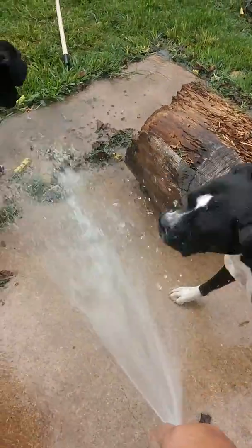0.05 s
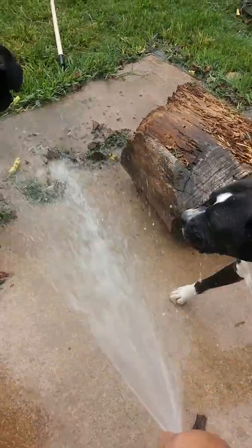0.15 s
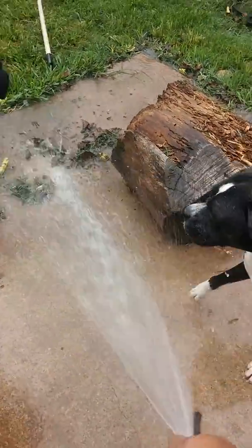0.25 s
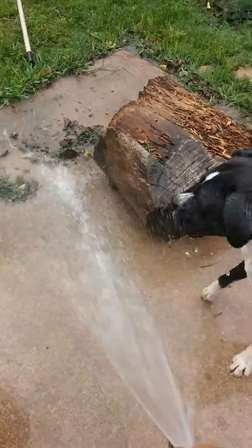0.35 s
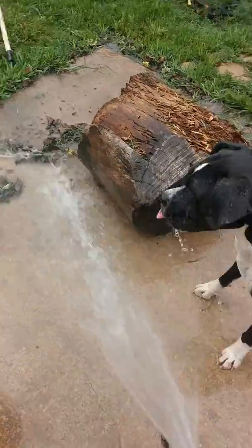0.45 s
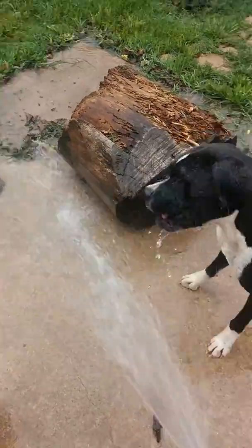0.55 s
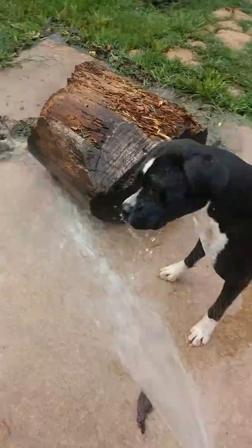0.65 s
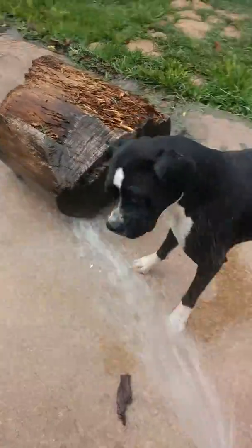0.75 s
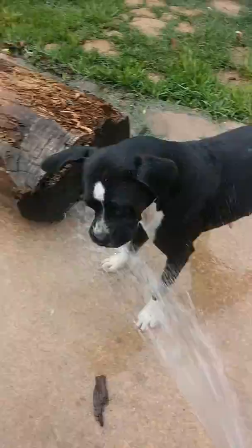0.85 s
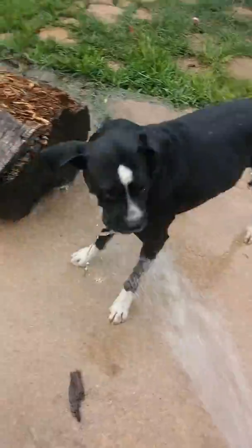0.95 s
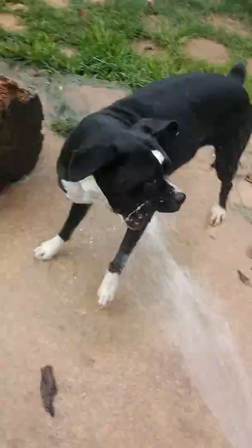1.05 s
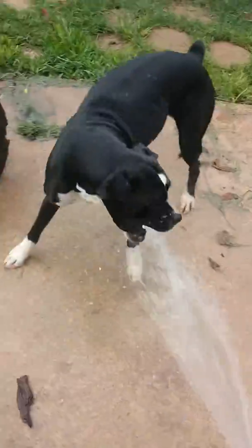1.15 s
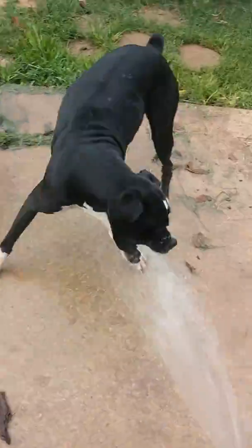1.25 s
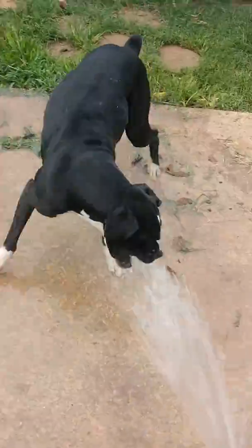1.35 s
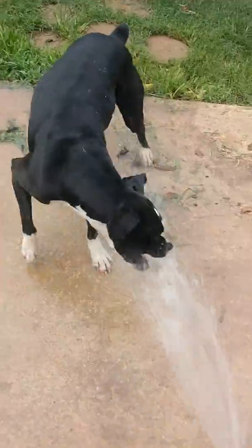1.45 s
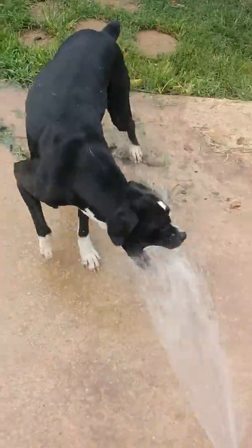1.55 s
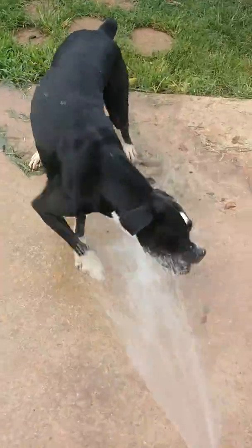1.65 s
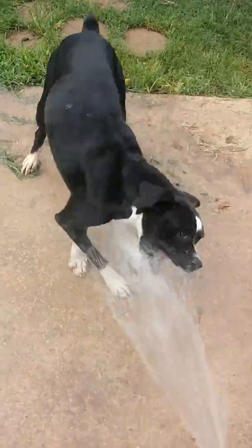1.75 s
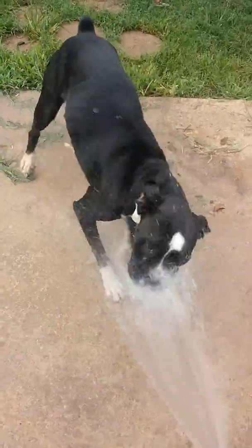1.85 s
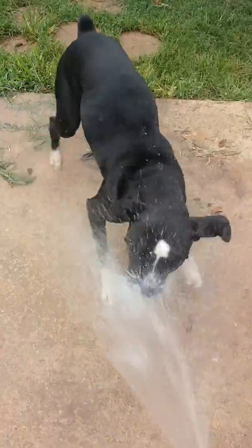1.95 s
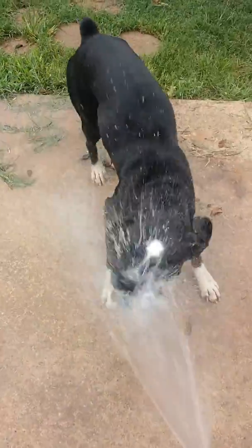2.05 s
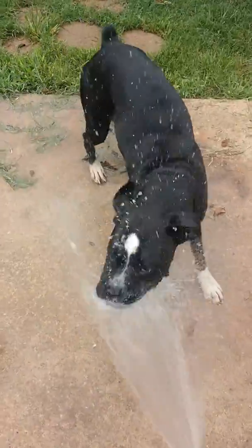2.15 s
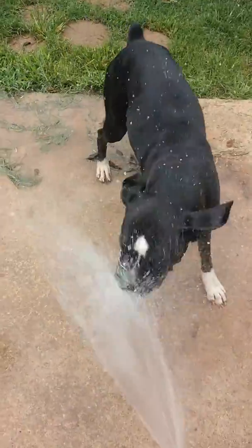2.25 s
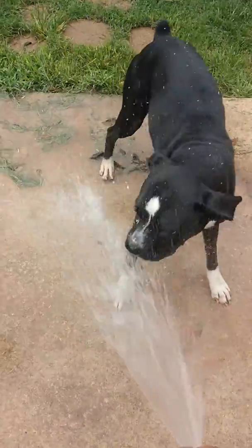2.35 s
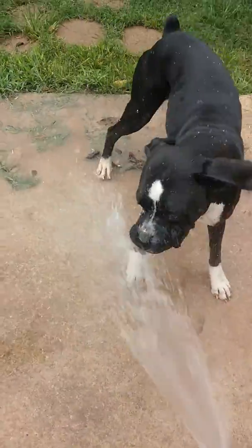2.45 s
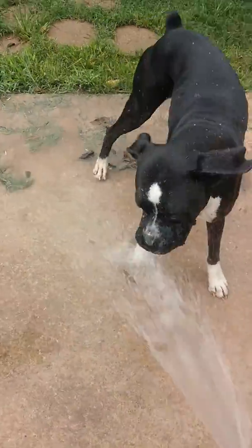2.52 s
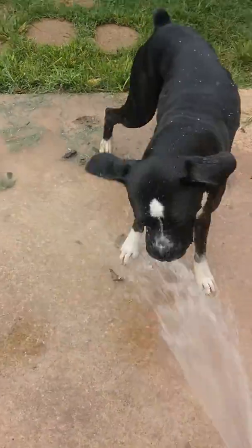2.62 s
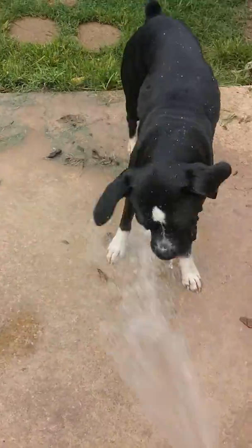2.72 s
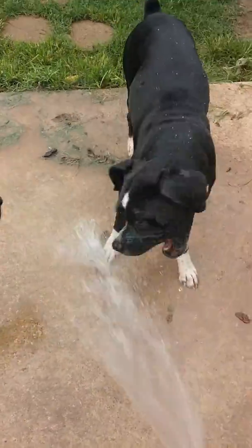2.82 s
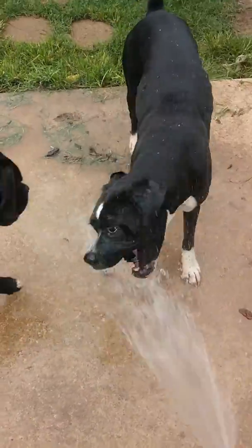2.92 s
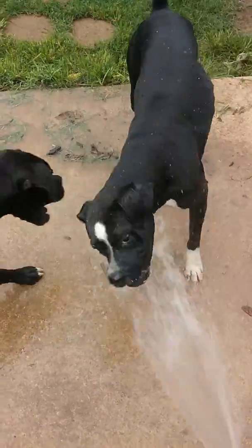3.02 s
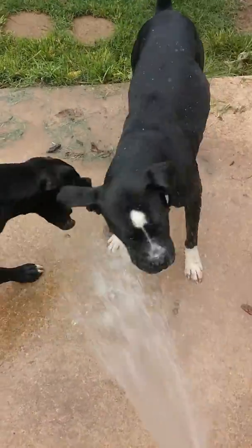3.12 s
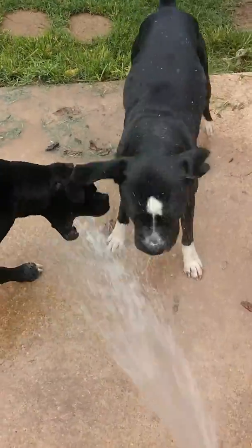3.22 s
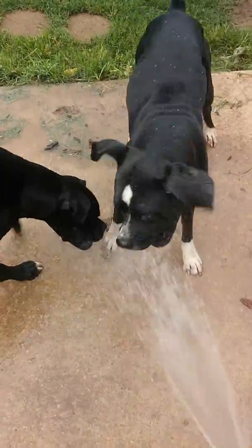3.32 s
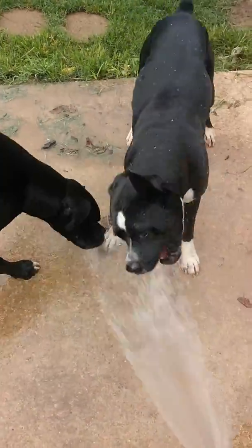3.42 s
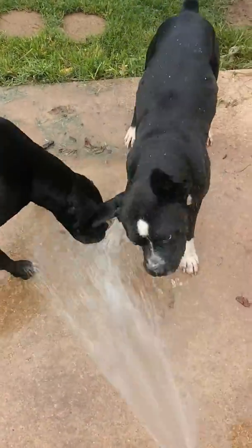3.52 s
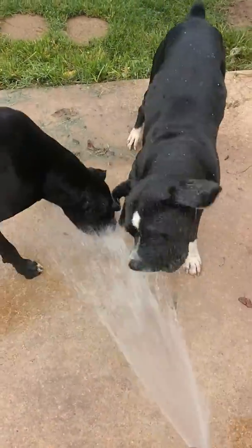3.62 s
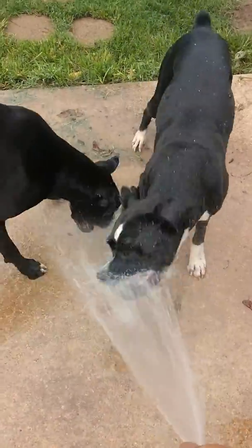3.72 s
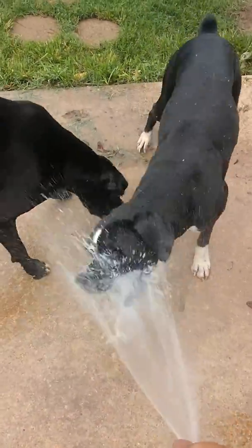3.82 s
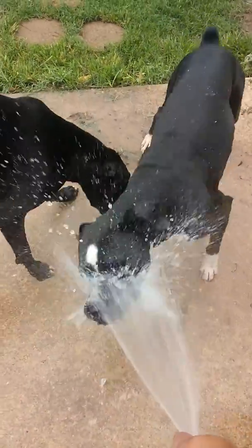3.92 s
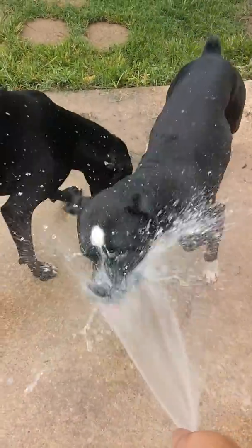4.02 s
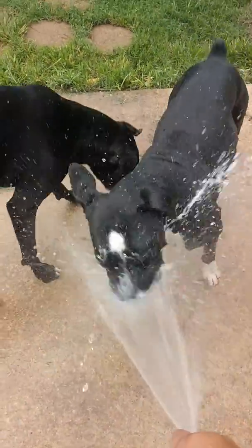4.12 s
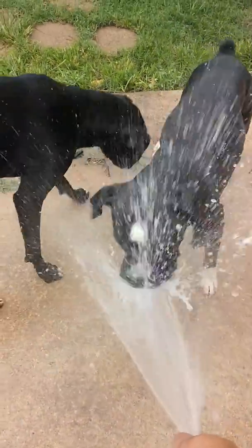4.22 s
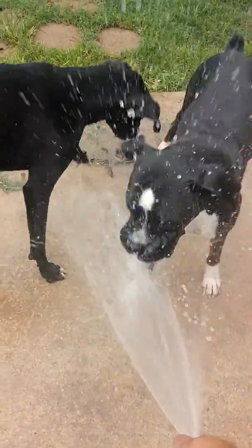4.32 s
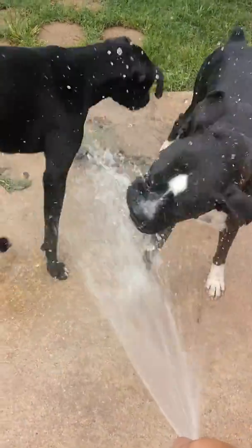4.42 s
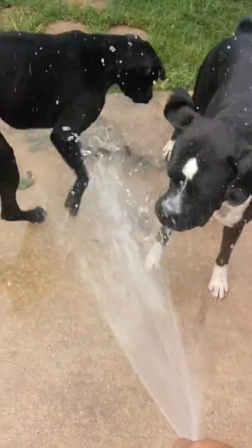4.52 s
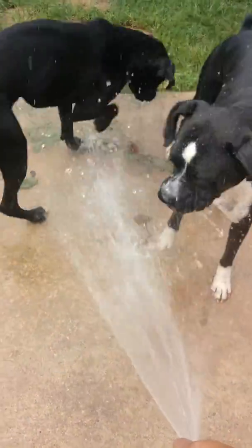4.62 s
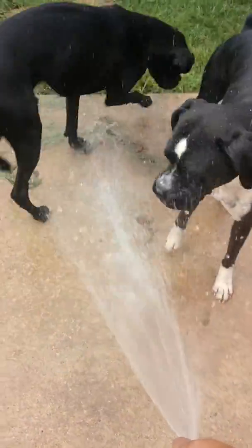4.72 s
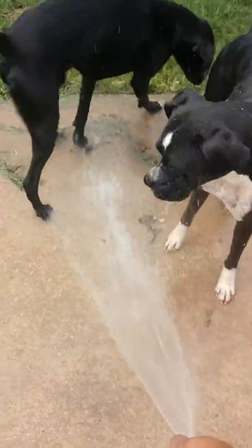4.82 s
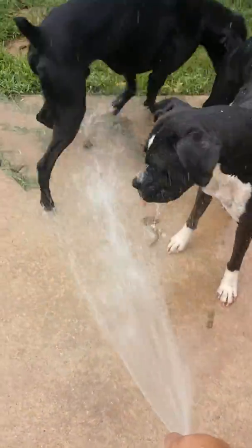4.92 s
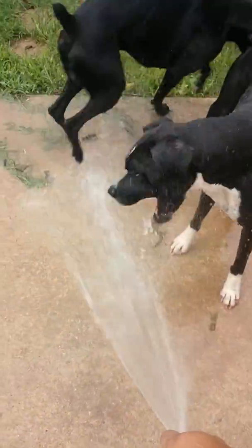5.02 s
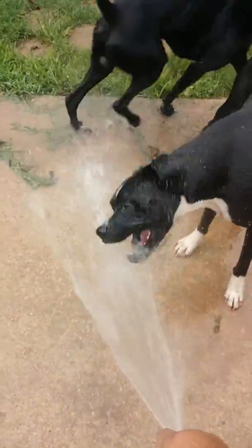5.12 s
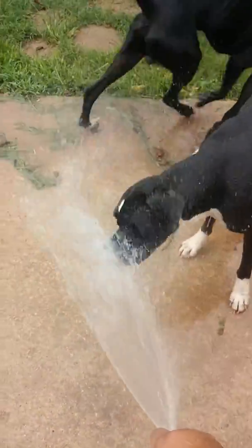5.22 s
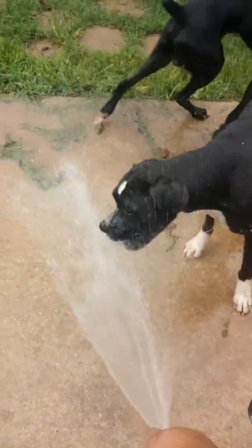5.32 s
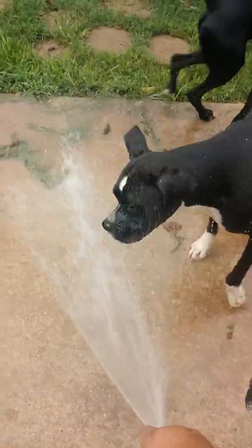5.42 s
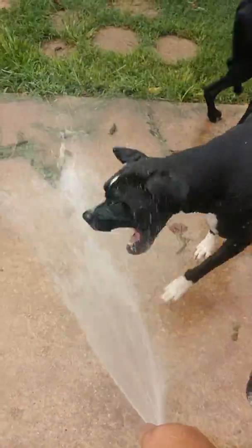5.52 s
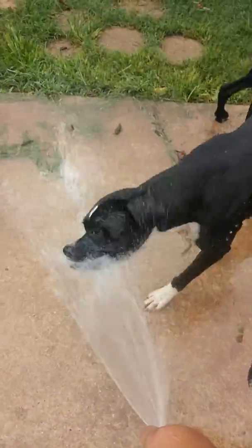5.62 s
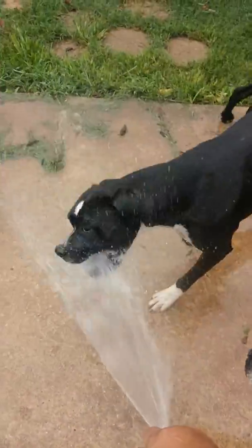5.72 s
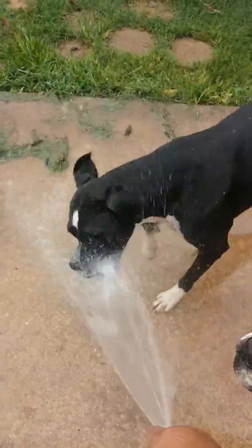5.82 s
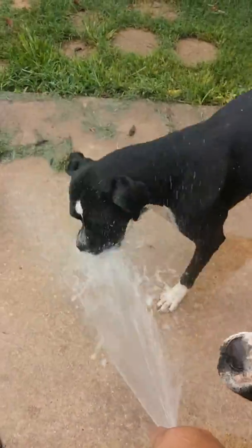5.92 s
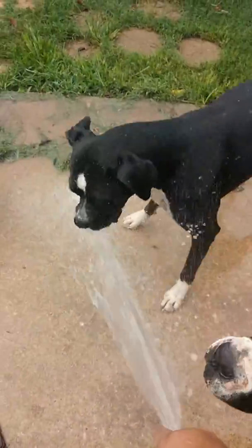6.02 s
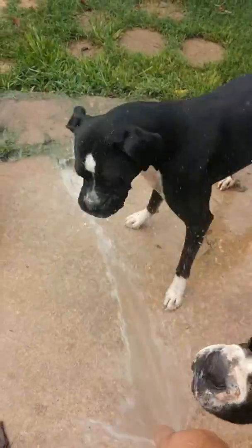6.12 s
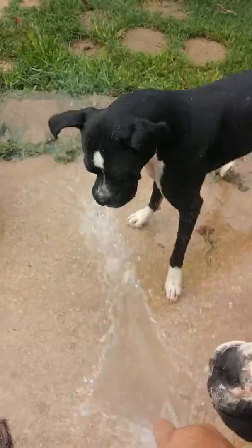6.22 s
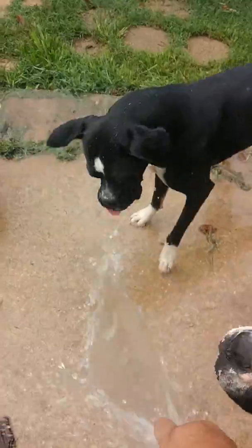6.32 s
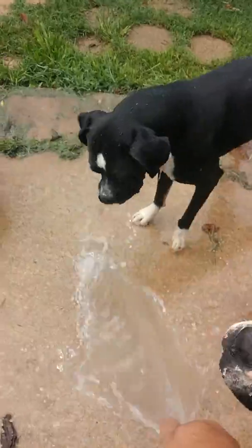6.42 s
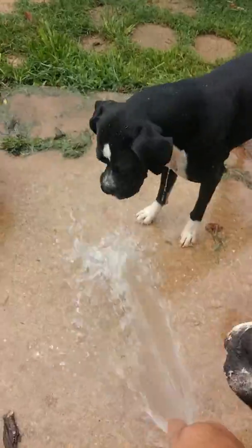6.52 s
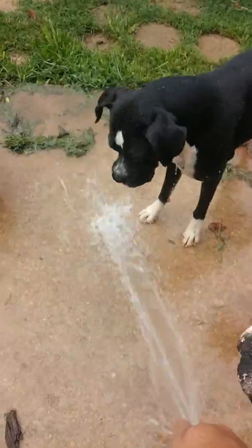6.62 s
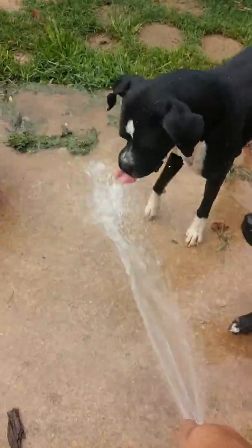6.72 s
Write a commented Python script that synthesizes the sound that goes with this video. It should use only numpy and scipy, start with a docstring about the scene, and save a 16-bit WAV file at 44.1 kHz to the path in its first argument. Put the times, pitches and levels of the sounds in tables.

```python
"""Water hisses on a concrete patio close to a two-port microphone: a garden hose, and a dog biting the jet.
Dense rains of damped rings over coloured noise make the fizz and patter on the slab; on the muzzle the jet
splatters, drums on the cheeks and gurgles in the open mouth. Ringing air pockets make the jaw claps and pops,
sliding narrow noise makes the slurps and a faint thin whistle that sinks, and fat drops slap the slab.
A low, uneven outdoor rumble lies underneath."""
import sys
import numpy as np
from scipy import signal
from scipy.fft import rfft, irfft, next_fast_len
from scipy.io import wavfile
from scipy.ndimage import uniform_filter1d, map_coordinates

SR = 44100
rng = np.random.default_rng(int(sys.argv[2]) if len(sys.argv) > 2 else 0)


def unload_wav(signal):
    """Save mono or channel-first audio to the path in sys.argv[1] as 16-bit WAV at rate SR, clipped to [-1, 1]."""
    wavfile.write(
        sys.argv[1],
        SR,
        np.round(np.clip(np.atleast_2d(signal).T, -1, 1) * 32767).astype(np.int16),
    )


N = 298116  # length [samples]


def amp(db):
    """Decibels to gain."""
    return 10 ** (np.asarray(db) / 20)


def unit(x):
    """Scale to rms 1."""
    return x / np.sqrt(np.mean(x ** 2) + 1e-20)


def along(points, hz):
    """Read (frequency [Hz], value) points on a log frequency axis."""
    f, v = np.transpose(points)
    return np.interp(np.log(hz + 1), np.log(f + 1), v)


def curves(rows):
    """One value per sample for each column after the time."""
    s, *cols = np.transpose(rows)
    return [np.interp(np.arange(N) / SR, s, c) for c in cols]


def wobble(rate):
    """A smooth random curve, rate knots a second."""
    knots = rng.standard_normal(int(N * rate / SR) + 4)
    return map_coordinates(knots, [np.arange(N) * rate / SR])


def filtered(x, response):
    """x times a response of frequency."""
    m = next_fast_len(N + 8192)
    return irfft(rfft(x, m) * response(np.fft.rfftfreq(m, 1 / SR)), m)[..., :N]


def pan(lean_db):
    """Left and right gains for a left-minus-right level difference."""
    return amp(np.array([[.5], [-.5]]) * lean_db)


def add(track, s, sound):
    """Mix a short sound into the track at time s."""
    part = track[:, round(s * SR):][:, :sound.shape[-1]]
    part += sound[..., :part.shape[1]]


def patchy(x, depth_db):
    """Shifting streams lift and drop small patches of pitch and time."""
    z = signal.stft(x, nperseg=1024)[2]
    field = uniform_filter1d(rng.standard_normal(z.shape[1:]), size=4, axis=0)
    field = uniform_filter1d(field, size=5, axis=1)
    return signal.istft(z * amp(depth_db * unit(field)), nperseg=1024)[1][:, :N]


def narrow(hz, width_hz):
    """Noise of rms 1 in a narrow band that follows a moving resonance."""
    at = np.arange(len(hz)) * width_hz / SR
    a, b = (map_coordinates(knots, [at], mode="wrap") for knots in rng.standard_normal((2, 128)))
    phase = 2 * np.pi * np.cumsum(hz) / SR
    return unit(a * np.cos(phase) + b * np.sin(phase))


def drops(lo_hz, hi_hz, cycles, spread_db, lag_s, count, size):
    """Stereo rain of damped rings: each drop has its own moment, pitch, weight and direction."""
    when, pitch, weight, place = rng.random((count, 4)).T[..., None]
    hz = lo_hz + (hi_hz - lo_hz) * pitch
    turns = hz * np.arange(size) / SR
    gain = np.sqrt(hz) * amp(-spread_db * np.log(weight + .01))
    ring = gain * np.exp(-turns / cycles) * np.sin(2 * np.pi * turns)
    start = (when * N).astype(int) + np.arange(size)
    lag = np.round((2 * place - 1) * lag_s * SR).astype(int)  # off-centre drops reach one port later
    ports = [np.bincount(np.abs(at).ravel(), ring.ravel(), N)[:N] for at in (start, start + lag)]
    return unit(np.array(ports))


def water(colour, grains, wash_db, patchy_db):
    """Single drops over the merged wash of countless small ones, coloured by what they hit."""
    # how alike the wash is at the two ports: (frequency [Hz], correlation [-1 to 1])
    likeness = [(60, .8), (130, 0.92), (290, 1), (640, 0.36), (1400, 0.015), (3100, 0.28), (6000, -0.15),
                (15000, 0.12)]

    def turn(hz):
        return np.arccos(np.clip(along(likeness, hz), -1, 1)) / 2

    def tint(hz):
        return amp(along(colour, hz))

    noise = patchy(rng.standard_normal((2, N)), patchy_db)
    mid, side = filtered(noise, lambda hz: tint(hz) * [np.cos(turn(hz)), np.sin(turn(hz))])
    wash = unit(np.array([mid + side, mid - side]))
    return unit(unit(filtered(grains, tint)) + amp(wash_db) * wash)


def cavity(hz, t60, rise, wet_db, wet_t60, width):
    """A struck pocket of air: a short rising ring and a wet rustle around the same pitch; peak 1."""
    t = np.arange(SR // 5) / SR
    pitch = hz * (1 + rise * np.minimum(t / t60, 1))
    ring = np.sin(2 * np.pi * np.cumsum(pitch) / SR) * amp(-60 * t / t60)
    f = np.fft.rfftfreq(len(t), 1 / SR) + 1
    band = 1 / (1 + (np.log2(f / hz) / width) ** 4)  # width in octaves
    rustle = unit(irfft(rfft(rng.standard_normal(len(t))) * band, len(t)))
    onset = 1 - np.exp(-2 * t * hz)
    sound = (ring + rustle * amp(wet_db - 60 * t / wet_t60)) * onset
    return sound / np.abs(sound).max()


def yard():
    """A low, uneven outdoor rumble: coloured noise nearly the same at both ports."""
    # rumble under the patio: (time [s], relative level [dB])
    rumble = [(0, -52.5), (1.0, -57), (2.25, -42.5), (2.6, -55.5), (3.1, -45.5), (3.55, -54), (3.78, -38),
              (4.1, -46.5), (5.5, -55), (5.9, -45), (6.15, -57), (6.76, -58)]
    # colour of the open air: (frequency [Hz], gain [dB])
    air_colour = [(20, -20), (45, -8), (70, 2), (110, 2), (200, -2.5), (340, -59), (570, -100)]
    air = rng.standard_normal(N) + 0.33 * rng.standard_normal((2, N))
    level_db = curves(rumble)[0] + 2.5 + 3.1 * wobble(11.0)
    return amp(level_db) * unit(filtered(air, lambda hz: amp(along(air_colour, hz))))


def whistle():
    """A faint, wavering whistle: a narrow noise band that sinks and fades."""
    # path of the whistle: (time [s], pitch [Hz], level [dB])
    path = [(4.40, 3060, -55), (4.44, 3050, -34), (4.51, 2980, -40), (4.59, 2940, -39), (4.68, 2810, -45),
            (4.77, 2800, -55)]
    hz, db = curves(path)
    t = np.arange(N) / SR
    tone = narrow(hz, width_hz=50)
    return tone * amp(db) * (t > path[0][0]) * (t < path[-1][0])


def slaps():
    """A fat drop cracks on the concrete and scatters into a short sizzle."""
    # fat drops on the slab: (time [s], peak [dB], relative left-right lean [dB])
    fat_drops = [(0.5334, -12, 18), (0.6067, -14, 3.5), (0.7198, -11, -4), (0.824, -10.5, -11),
                 (0.9986, -11, 2), (1.5657, -23, -7), (1.708, -20, -6), (2.793, -25, -9), (4.5301, -13, 6),
                 (4.589, -15, 15), (5.3423, -8, 4), (6.1494, -13, -2), (6.5316, -13.5, -4), (6.575, -16, 4),
                 (6.7448, -11, 3.0)]
    track = np.zeros((2, N))
    for s, db, lean_db in fat_drops:
        crack = cavity(6130, t60=0.0035, rise=0, wet_db=-15, wet_t60=0.028, width=0.48)
        add(track, s, amp(db) * pan(0.56 * lean_db) * crack)
    return track


def pops():
    """Trapped air bursts from the lips and the puddles, each a short ring of rising pitch."""
    # bursting pockets: (time [s], peak [dB], starting pitch [Hz], 60 dB decay [s], left-right lean [dB])
    pockets = [(0.308, -17.5, 1880, 0.0033, 13), (1.066, -26, 2220, 0.011, 7), (1.594, -22, 1920, 0.018, 0),
               (1.887, -20, 1350, 0.012, 7), (2.14, -11, 3970, 0.0093, 3.5),
               (2.627, -15.5, 1970, 0.021, 1.5), (2.879, -19, 2350, 0.024, 1.5),
               (3.022, -19, 3870, 0.012, -1), (3.09, -17, 1365, 0.019, 4), (4.156, -22, 4080, 0.01, 7),
               (4.401, -20, 2400, 0.01, 9), (5.035, -26.5, 1160, 0.018, 3), (5.045, -26.5, 895, 0.038, 5.5),
               (5.715, -0.5, 3440, 0.006, 7), (5.988, -6.5, 3270, 0.008, 4),
               (6.101, -19.5, 2900, 0.013, 10), (6.185, -17.5, 3460, 0.0064, 9),
               (6.447, -22, 3600, 0.013, 4), (6.49, -20.5, 1960, 0.048, 1), (6.502, -18.5, 3320, 0.015, 7),
               (6.531, -21.5, 2070, 0.014, 0), (6.655, -7.5, 2540, 0.0062, -2),
               (6.663, -3, 3050, 0.0035, 7)]
    track = np.zeros((2, N))
    for s, db, hz, t60, lean_db in pockets:
        burst = cavity(hz, t60, rise=.1, wet_db=-13, wet_t60=.022, width=.8)
        add(track, s, amp(db) * pan(lean_db) * burst)
    return track


def slurps():
    """Rushing water rings the mouth cavity, its pitch sliding as it fills or opens; bubbles break it up."""
    # sucked water: (time [s], length [s], first pitch [Hz], last pitch [Hz], relative level [dB])
    sucks = [(0.887, 0.092, 2810, 3110, -33.5), (1.005, 0.077, 744, 844, -42),
             (1.614, 0.045, 1370, 1280, -41), (1.702, 0.042, 1317, 1300, -35),
             (1.765, 0.064, 478, 1090, -31.5), (1.806, 0.074, 1270, 1304, -35.5),
             (1.872, 0.045, 1418, 1430, -31), (1.896, 0.21, 733, 637, -32.5),
             (2.186, 0.15, 646, 573, -27.5), (3.211, 0.053, 2374, 2150, -29),
             (3.237, 0.12, 1437, 1890, -32), (3.316, 0.036, 420, 630, -37),
             (3.437, 0.059, 1275, 1430, -37.5), (3.617, 0.063, 1920, 1915, -37),
             (3.884, 0.067, 906, 948, -25.5), (4.198, 0.11, 560, 529, -21)]
    track = np.zeros((2, N))
    for s, length, from_hz, to_hz, db in sucks:
        u = np.linspace(0, 1, max(round(length * SR), 64))
        band = narrow(from_hz + (to_hz - from_hz) * u, width_hz=.38 * from_hz)
        swell = np.sqrt(np.abs(np.sin(np.pi * u)))
        add(track, s, amp(db) * swell * band)
    return track * amp(2.6 * wobble(260) - 0.6)


def chomps():
    """Soft jaws and wet lips clap on a mouthful of water and ring the air in it."""
    # claps: (time [s], relative peak [dB], starting cavity pitch [Hz], 60 dB decay [s])
    claps = [(0.673, -18, 277, 0.089), (.678, -20.5, 663, 0.07), (1.746, -17.5, 675, 0.1),
             (1.771, -19, 256, 0.059), (1.893, -13.5, 350, 0.069), (2.14, -11, 617, 0.066),
             (3.128, -7, 247, 0.035), (3.13, -23, 540, 0.022), (3.315, -22, 509, 0.034),
             (3.729, -15, 280, 0.1), (4.753, -25, 744, 0.14), (5.249, -22, 634, 0.12),
             (5.714, -12, 352, 0.034), (6.568, -25.5, 416, 0.082)]
    track = np.zeros((2, N))
    for s, db, hz, t60 in claps:
        clap = cavity(hz, t60, rise=0.17, wet_db=-3.0, wet_t60=0.078, width=0.71)
        add(track, s, amp(db - 4.5) * clap)
    return track


def bite_gains():
    """Drumming, gurgle, splatter and fizz gains: each bite rises, holds, falls and leaves a dripping tail."""
    # the muzzle catches the jet: (time [s], held [s], then relative levels of
    # drumming [dB], gurgle [dB], splatter [dB], fizz [dB])
    bites = [(1.715, 0.021, -41, -36, -35, -28), (1.893, 0.044, -24.5, -31.5, -26, -38),
             (1.975, 0.044, -25, -27.5, -31.5, -40), (2.05, 0.079, -31.5, -32.5, -30.5, -31),
             (2.138, 0.0045, -21, -23.5, -19.5, -20.5), (2.18, 0.03, -27, -20.5, -21.5, -26),
             (2.236, 0.081, -19.5, -24, -23, -28), (3.826, .13, -20, -22, -16, -25),
             (3.975, .16, -23, -22.5, -14.5, -27), (4.155, 0.051, -24, -18.5, -17, -26.5),
             (4.205, 0.052, -19, -19.5, -15.5, -23.5), (4.278, 0.043, -20, -22, -16.5, -32),
             (4.423, 0.041, -24, -29, -22, -32), (5.248, 0.035, -30, -33.5, -33, -24),
             (5.33, .022, -35, -44, -37.5, -23.5), (5.717, 0.079, -21.5, -24, -18.5, -25),
             (5.83, 0.023, -35, -25, -27, -33), (5.87, 0.027, -21.5, -19.5, -19.5, -33),
             (5.915, 0.037, -23.5, -25.5, -18, -30), (5.974, 0.037, -26.5, -32, -21.5, -26)]
    rise_db_per_s, fall_db_per_s = 557, 286  # the jaws close on the jet and let it go
    drip_db, drip_fall_db_per_s = -20, 51  # water running off the muzzle afterwards
    t = np.arange(N) / SR
    gains = np.zeros((4, N))
    for s, held, *layers_db in bites:
        before, after = np.maximum(s - t, 0), np.maximum(t - s - held, 0)
        release_db = np.maximum(-fall_db_per_s * after, drip_db - drip_fall_db_per_s * after)
        shape_db = release_db - rise_db_per_s * before
        gains = np.maximum(gains, np.outer(amp(layers_db), amp(shape_db)))
    return gains


def flow():
    """Gain of the arriving water: 1, except in brief smooth dips."""
    # dips of the hose: (centre time [s], half-width to 1/e of the depth [s], depth [dB])
    dips = [(1.785, 0.03, 5.5), (2.385, 0.02, 0.5), (4.373, 0.021, 8), (6.068, 0.029, 9.5)]
    t = np.arange(N) / SR
    return amp(-sum(depth_db * np.exp(-((t - s) / width) ** 2) for s, width, depth_db in dips))


def sloshing():
    """Gain of the slugs of water landing on the slab: each swells quickly and ebbs."""
    # slugs: (time [s], length [s], relative level [dB])
    slugs = [(0.415, 0.13, -30.5), (0.869, 0.1, -29), (0.996, 0.032, -32), (1.44, 0.072, -34),
             (1.582, 0.043, -36), (2.635, 0.093, -34), (2.852, 0.088, -32), (3.215, .1, -35),
             (3.336, 0.083, -33.5), (3.63, 0.066, -32.5), (6.253, 0.057, -34), (6.569, 0.05, -30)]
    t = np.arange(N) / SR
    gain = 0
    for s, length, db in slugs:
        u = np.clip((t - s) / length, 0, 1) ** 0.32  # power below 1: in faster than out
        gain = gain + amp(db) * np.sqrt(np.abs(np.sin(np.pi * u)))
    return gain


def spray(thrown):
    """Fine drops fizz on the wet concrete and fly off the muzzle; the finest mist adds the top."""
    # fine spray landing on the slab: (time [s], relative fizz [dB], relative finest mist [dB])
    fizz = [(0, -30, -37.5), (.7, -28.5, -39), (1.0, -26.5, -36), (1.08, -32, -41), (1.48, -36, -46),
            (1.6, -33.5, -40.5), (1.87, -26.5, -35), (2.1, -32.5, -38.5), (2.45, -32.5, -39),
            (2.56, -29.5, -39), (3.1, -34.5, -40), (3.33, -27.5, -37), (3.65, -34.5, -39),
            (4.48, -29.5, -39), (5.15, -32, -38.5), (5.29, -29.5, -34), (5.47, -32, -43), (5.72, -33, -37),
            (6.25, -27.5, -40), (6.43, -38.5, -54), (6.76, -26, -41)]
    # colour of the hiss: (frequency [Hz], gain [dB])
    hiss = [(2470, -32), (4200, -33), (4590, -7.5), (4940, -10), (5280, -4.5), (6650, 1.5), (7770, -2),
            (8550, -0.5), (10200, -5), (11800, -9.5), (13700, -10), (15100, -8), (16000, -12.5)]
    # where the spray lands: (time [s], relative left-right lean [dB])
    aim = [(0, 4), (.55, 3), (1.05, 1), (1.5, -0.5), (2.0, 2), (2.45, 1.5), (2.65, -2.5), (3.2, -1),
           (3.32, 3), (3.45, -1), (4.25, 0.5), (4.44, 4), (5.1, 1.5), (5.55, 5), (6.0, 2), (6.15, 0),
           (6.45, 4), (6.76, 1)]
    fizz_db, mist_db = curves(fizz)
    fine = drops(4560, 16600, cycles=2.1, spread_db=2.5, lag_s=.00016, count=16000, size=48)
    rain = water(hiss, fine, wash_db=1.5, patchy_db=3.5)
    mist = filtered(rain, lambda hz: 1 / (1 + (10800 / (hz + 1)) ** 12))  # only the top
    fizz_gain = np.hypot(amp(fizz_db + 1.5), thrown)
    mist_gain = np.hypot(amp(mist_db + 3.5), amp(-12) * thrown)  # muzzle mist 12 dB under its fizz
    layers = unit(rain - mist) * fizz_gain + unit(mist) * mist_gain
    return layers * amp(0.67 * wobble(45) + 0.72 * wobble(5.4)) * pan(1.04 * curves(aim)[0])


def jet(drumming, gurgling, splatter):
    """The jet breaks on muzzle and slab; its lumps shake drumming, gurgle and splatter together."""
    # the jet churns the standing water: (time [s], relative gurgle [dB], relative drumming [dB])
    puddle = [(0, -32.5, -37.5), (.35, -32, -44), (.7, -45.5, -44.5), (1.45, -46.5, -45.5),
              (1.65, -41.5, -38.5), (2.55, -47, -44.5), (2.9, -41.5, -45), (3.27, -34, -40),
              (3.5, -41, -45.5), (3.72, -38, -36.5), (4.65, -49, -43.5), (5.55, -47, -45),
              (6.18, -42.5, -44.5), (6.38, -68, -58), (6.6, -42, -50.5), (6.76, -38, -51)]
    # core of the jet on the wet slab: (time [s], relative patter level [dB])
    patter_level = [(0, -27), (.49, -33), (.65, -38), (.8, -38), (1.0, -36), (1.25, -39), (1.65, -37),
                    (2.55, -39), (3.1, -38), (3.36, -35), (3.48, -36.5), (3.75, -37.5), (4.55, -37.5),
                    (4.85, -42), (5.6, -43.5), (6.15, -32.5), (6.36, -48.5), (6.54, -35.5), (6.76, -23.5)]
    # colours of cheeks, mouth, muzzle and coarse drops on concrete: (frequency [Hz], gain [dB])
    cheek_colour = [(45, -55), (85, -19.5), (140, -8), (215, -1.5), (290, 0), (440, -5), (570, -4.5),
                    (720, -3), (830, -5.5), (930, -10), (1080, -12.5), (1500, -12), (2500, -100)]
    mouth_colour = [(600, -19.5), (880, 3.5), (1060, -10.5), (1200, -6), (1420, 0), (1650, -3.5), (1900, 3),
                    (2100, 1), (2400, -0.5), (3100, -13), (5000, -100)]
    muzzle_colour = [(1300, -38), (2100, -8), (2800, -2), (3250, 1), (3600, 1), (3950, 3.5), (4400, -1),
                     (5000, -5), (5900, -2.5), (8000, -12), (10400, -16), (16000, -100)]
    slab_colour = [(1300, -27), (1950, -9), (2450, -2.5), (2900, 2.5), (3700, 2), (4350, 0.5), (5000, -1.5),
                   (5900, 5), (7200, -10.5), (12000, -46)]
    churn_db, thrum_db = curves(puddle)
    lumps, slosh = wobble(130), sloshing()

    thuds = drops(171, 1140, cycles=2.6, spread_db=2.5, lag_s=0.00025, count=2200, size=800)
    cheeks = water(cheek_colour, thuds, wash_db=2.0, patchy_db=4.5)
    bubbles = drops(921, 2580, cycles=4.2, spread_db=0.5, lag_s=0.000063, count=2600, size=500)
    mouth = water(mouth_colour, bubbles, wash_db=3.5, patchy_db=6.0)
    fine = drops(1920, 7900, cycles=2.6, spread_db=2.5, lag_s=.00007, count=15000, size=128)
    coarse = drops(1660, 7500, cycles=4.1, spread_db=3.3, lag_s=.0001, count=4500, size=160)
    on_muzzle = water(muzzle_colour, fine, wash_db=2.5, patchy_db=3.5)
    on_slab = water(slab_colour, coarse, wash_db=3.0, patchy_db=3.5)

    surge = amp(0.6 * wobble(16))  # the stream lands unevenly
    low = np.hypot(drumming, surge * amp(thrum_db))
    puddle_gurgle = np.hypot(surge * amp(churn_db), amp(-7.5) * slosh)  # the puddle answers each slosh
    gurgle = np.hypot(gurgling, puddle_gurgle)
    patter = np.hypot(surge * amp(curves(patter_level)[0]), slosh)
    return (cheeks * low * amp(-0.85 + 0.72 * lumps)
            + mouth * gurgle * amp(0.1 + 0.67 * lumps)
            + (on_muzzle * splatter + on_slab * patter) * amp(3.0 + 0.48 * lumps))


def scene():
    """All sources in the open air."""
    drumming, gurgling, splatter, fizz = bite_gains()
    hose = flow() * (spray(fizz) + jet(drumming, gurgling, splatter))
    return hose + chomps() + slurps() + pops() + slaps() + whistle() + yard()


def record(dry):
    """The two ports colour the sound differently and shed deep bass; peaks round off; the band ends steeply."""
    # level difference of the microphone ports: (frequency [Hz], left-right lean [dB])
    port_lean = [(60, 1.5), (280, 3.5), (450, -1), (680, -1), (950, 1.5), (1200, 12.5), (1600, 4),
                 (2350, 4), (2900, 3), (3500, 0), (4600, 7), (6000, 3), (8500, -4), (15000, 0)]
    top_hz = 15950
    coloured = filtered(dry, lambda hz: pan(along(port_lean, hz)))
    rounded = coloured / (1 + coloured ** 8) ** (1 / 8)
    bass_cut = signal.butter(2, 58, "highpass", fs=SR, output="sos")
    return filtered(signal.sosfilt(bass_cut, rounded), lambda hz: hz < top_hz)


dry = scene()
out = record(dry)
unload_wav(out)
```